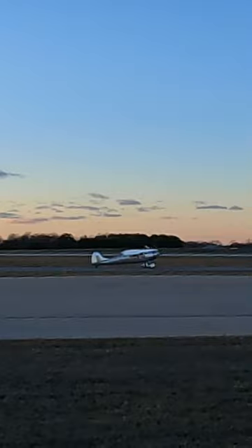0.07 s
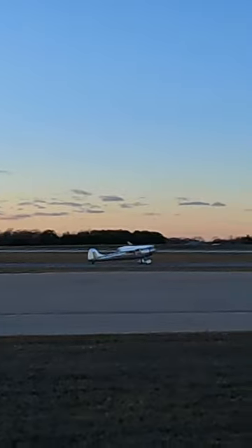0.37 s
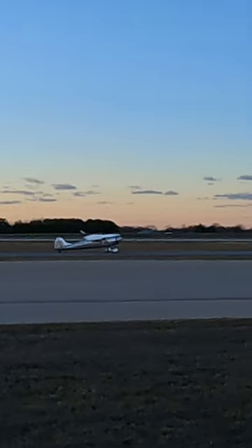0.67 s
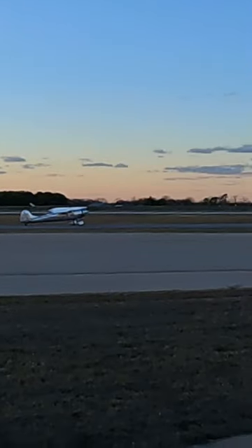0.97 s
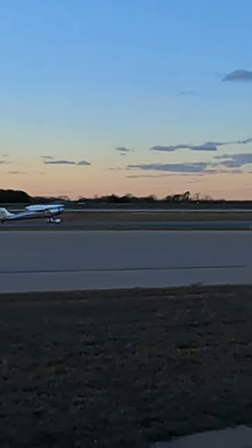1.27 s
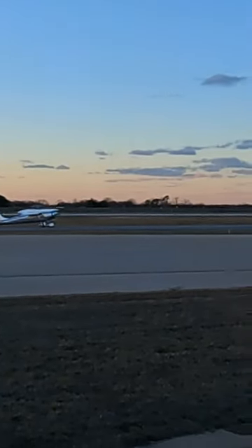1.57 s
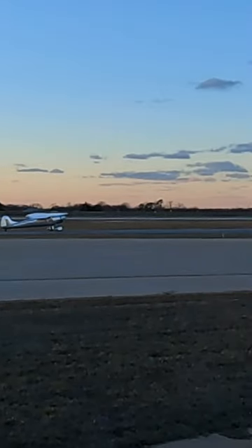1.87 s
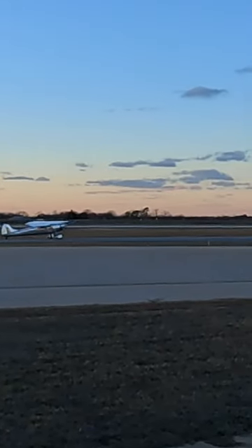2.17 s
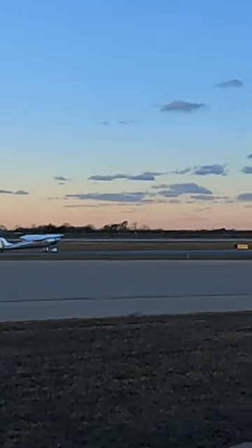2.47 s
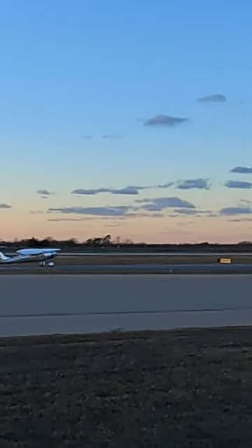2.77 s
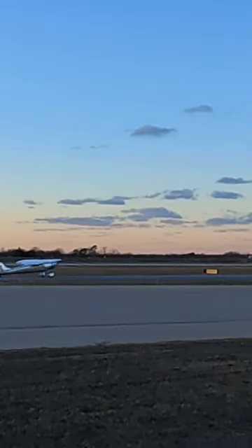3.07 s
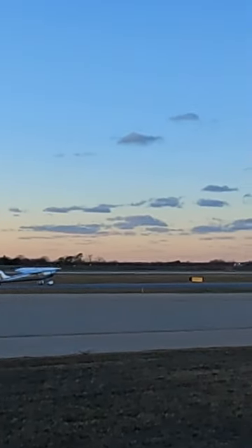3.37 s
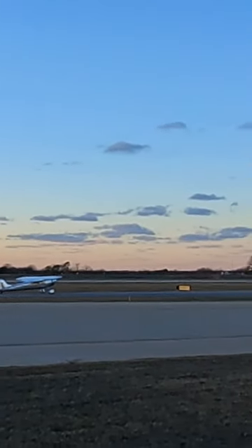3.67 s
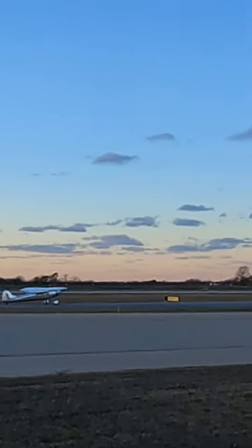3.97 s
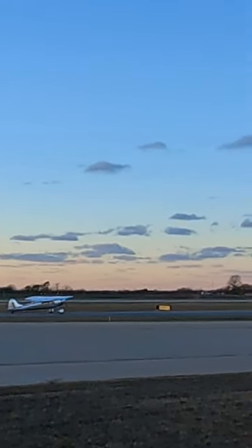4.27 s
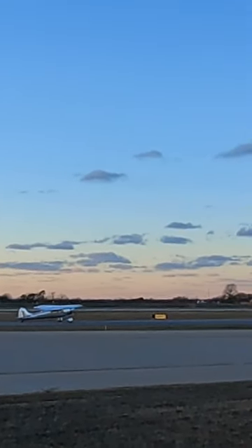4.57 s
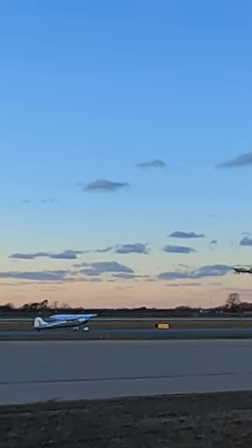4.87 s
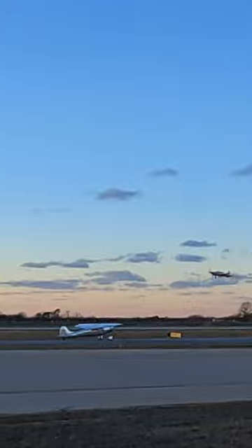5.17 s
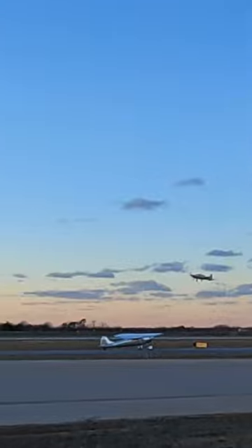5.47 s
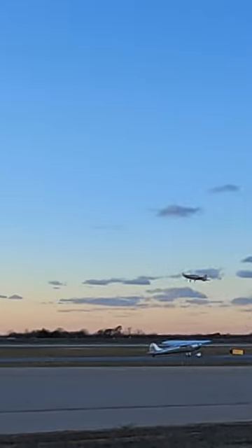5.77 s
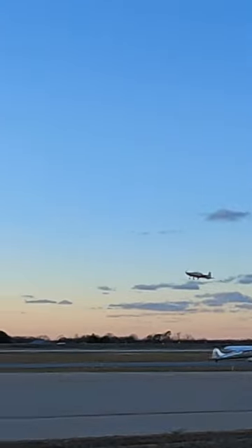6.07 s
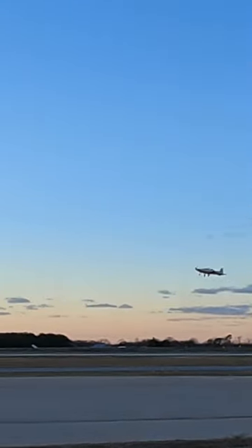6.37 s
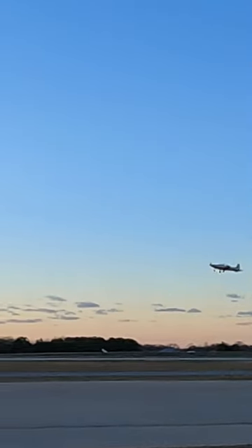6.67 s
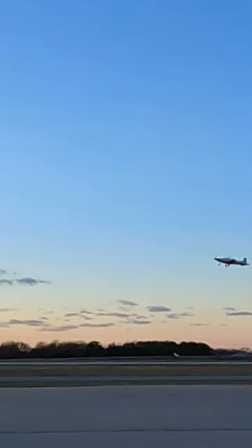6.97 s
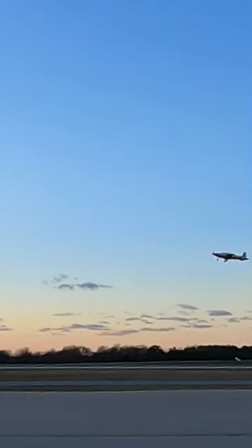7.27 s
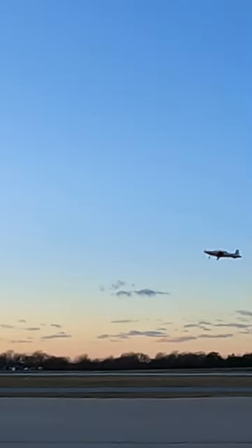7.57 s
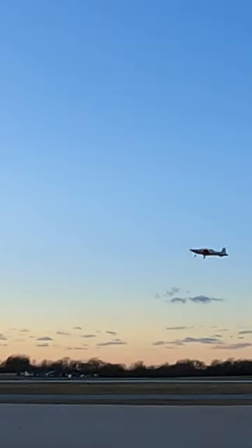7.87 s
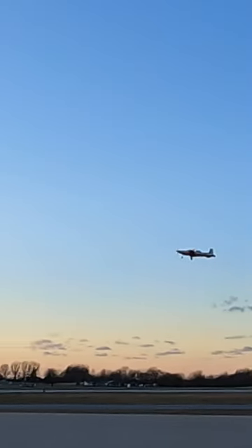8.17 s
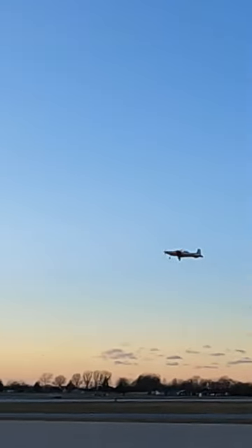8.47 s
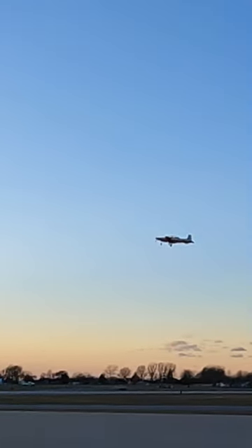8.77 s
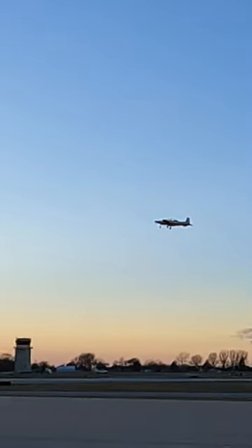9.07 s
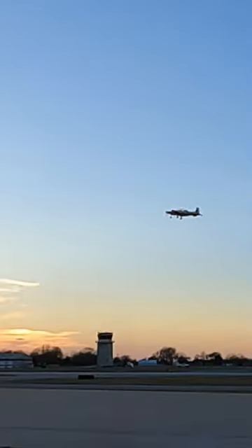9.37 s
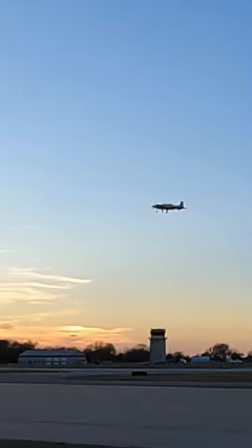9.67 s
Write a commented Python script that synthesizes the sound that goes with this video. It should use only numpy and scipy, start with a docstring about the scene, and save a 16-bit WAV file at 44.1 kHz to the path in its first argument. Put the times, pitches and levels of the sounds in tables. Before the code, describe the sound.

A small propeller plane taxis by, rumbling and clattering, as a second swells into a low flypast, with light wind on the microphone.

```python
"""A light plane's seven-cylinder radial engine taxis past: its firings rumble and spit in the exhaust,
its jet and blades rasp, its valves clatter. Behind it a second propeller plane flies in low and passes:
the blade pulses swell into a drone that sinks with the Doppler shift, amid engine whine and a surging
roar of torn air. Brief rustles come and go, and a light wind flutters on the microphone."""
import sys
import numpy as np
from scipy import signal
from scipy.fft import rfft, irfft, next_fast_len
from scipy.io import wavfile
from scipy.ndimage import uniform_filter1d

SR = 44100
rng = np.random.default_rng(int(sys.argv[2]) if len(sys.argv) > 2 else 0)


def generate_wav(sig):
    """Save sig (samples, or channels by samples) to the path in sys.argv[1] as 16-bit PCM at SR."""
    pcm = np.round(np.clip(np.atleast_2d(sig).T, -1, 1) * 32767).astype(np.int16)
    wavfile.write(sys.argv[1], SR, pcm)


N = 433503
T = np.arange(N) / SR

# The throttle is nudged, then the engine settles. Each row: time in seconds, firings per second.
FIRING_RATE = [(0, 60), (.73, 72.7), (1.7, 63.2), (3.03, 67.4), (3.86, 64.5), (5.9, 66), (9.8, 66)]
# A band of rasp and clatter lifts and hollows as the plane turns.
# Each row: time in seconds, centre in Hz, gain in dB.
TURNING_COLOUR = [(.4, 4700, 6), (1.0, 4000, 6), (1.5, 3570, -6.5), (3.0, 3540, -3.5), (5.399, 3830, 2.5),
                  (6.6, 4195, -6), (7.5, 4240, 3.5)]

def taxiing_plane():
    """The radial engine: seven firings and two propeller turns make one cycle."""
    firing_hz, = in_time(FIRING_RATE)
    firings = np.cumsum(firing_hz * (1 + .003 * drift(2.5))) / SR
    cycles = firings / 7
    valves = valve_clatter(firings)
    jet = rasp(firings, firing_hz, shaft=2 * cycles)
    bright_layer = moving_eq(jet + valves, TURNING_COLOUR, width_hz=590)
    return exhaust(cycles) + bright_layer + squeaks() + exhaust_spits() + dry_ticks()


# The exhaust's fader. Each row: time in seconds, level in dB.
EXHAUST_LEVEL = [(0, -20.5), (.75, -20.5), (1.5, -22.5), (2.3, -23.5), (2.75, -23.5), (3.05, -26.5),
                 (4.2, -25), (5.9, -24), (6.35, -28.5), (7.5, -28), (8.1, -27.5), (8.6, -31), (8.9, -24),
                 (9.35, -33), (9.8, -26)]
# Its note. Each row: multiple of the engine cycle rate, relative level in dB.
EXHAUST_ORDERS = [(4, -11.5), (5, -14), (7, -7), (8, -12.5), (9, -0.5), (10, -6.5), (11, -14), (12, -0.5),
                  (13, -12), (14, -1.2), (16, -8), (24, -20.5), (26, -19.5), (28, -27)]
# Its rumble. Each row: frequency in Hz, relative density in dB.
RUMBLE_SPECTRUM = [(25, -13), (45, 3.5), (85, -2), (130, -1), (165, -4.5), (195, -14.5), (245, -14),
                   (330, -27.5), (500, -38.5)]

def exhaust(cycles):
    """Unequal cylinders give multiples of the cycle rate, hollowed by the pipe, over an unsteady rumble."""
    note = rms_one(sum(from_db(db) * tone(order * cycles + rng.random(), scatter=.4, rate=.33)
                       for order, db in EXHAUST_ORDERS))
    pipe_notch = signal.iirnotch(180, Q=6, fs=SR)
    note = signal.lfilter(*pipe_notch, note)
    note *= np.interp(T, [1.0, 1.6], [.65, 1])   # weaker while the throttle moves
    return fader(EXHAUST_LEVEL) * (note + from_db(-1) * coloured(RUMBLE_SPECTRUM))


# The fader shared by rasp, clatter and spits. Each row: time in seconds, level in dB.
RASP_LEVEL = [(0, -52), (.7, -52.5), (1.7, -52), (2.4, -62.5), (2.8, -61), (3.4, -56), (3.9, -53),
              (4.15, -55), (4.55, -53), (5.85, -56), (6.3, -57)]

def rasp_db():
    """The rasp follows its fader, then dies by 4 dB a second as the plane rolls away."""
    return in_time(RASP_LEVEL)[0] - 4 * np.maximum(T - RASP_LEVEL[-1][0], 0)


# How hard the rasp is chopped. Each row: time in seconds, depth from 0 to 1.
CHOP_DEPTH = [(0, 0.46), (.8, 0.36), (1.5, 0.3), (2.3, 0.19), (4, 0.32), (5.7, 0.49)]
# Its colour as the plane rolls by. Each row: frequency in Hz, early and late relative density in dB.
RASP_SPECTRUM = [(200, -19, -5.5), (410, -1, 3.5), (666, 5.5, 6), (1320, -1.5, -2), (1820, -9.5, -17),
                 (2330, -11, -13), (2780, -10, -11.5), (3527, -12, -11), (4760, -22, -19),
                 (5440, -22.5, -25.5), (7060, -24.5, -28.5), (9600, -42, -40), (11000, -71, -62),
                 (13000, -72, -72.5)]
# A ringing peak slides through it as the plane turns. Each row: time in seconds, centre in Hz, boost in dB.
RASP_PEAK = [(.1, 2400, 5.5), (.6, 2440, 3), (1.0, 2480, 5.5), (1.9, 2290, 7), (3.5, 2120, 10),
             (5, 2190, 10), (6.299, 2320, 11)]

def rasp(firings, firing_hz, shaft):
    """Firings and blade passes chop the exhaust jet's bright noise; each firing has its own colour."""
    depth, = in_time(CHOP_DEPTH)
    chop = (puffs(firings, sharpness=2.4, uneven_db=7)
            + .78 * puffs(shaft, sharpness=2.8, uneven_db=0)
            + 2.8 * puffs(2 * shaft, sharpness=.77, uneven_db=-4))
    flutter = rms_one(1 - depth + depth * rms_one(chop))
    rev_lift = from_db(.69 * (firing_hz - 67.3))   # the top brightens with the revs
    turned = np.clip((T - 2) / .89, 0, 1)
    points_hz, *colours_db = np.transpose(RASP_SPECTRUM)
    edges_hz = np.geomspace(200, 13000, 25)
    jet, treble_power = 0, 0
    for low, high in zip(edges_hz, edges_hz[1:]):
        early, late = (from_db(np.interp(np.log(low * high) / 2, np.log(points_hz), db))
                       for db in colours_db)
        gain = np.sqrt(high - low) * (early * (1 - turned) + late * turned)
        uneven_db = np.interp(low, [800, 3000], [1.2, 3])
        per_firing = rms_one(from_db(uneven_db * rng.standard_normal(700)))
        flicker = np.interp(firings, np.arange(700), per_firing)
        jet += gain * flicker * (rev_lift if low > 4700 else 1) * band(low, high, 0, order=20)
        treble_power += gain ** 2 * (low > 2800)
    jet *= from_db(rasp_db() - .5) * flutter / np.sqrt(treble_power)   # the fader rides the treble
    return moving_eq(jet, RASP_PEAK, width_hz=150)


# The ring of the valve gear. Each row: pitch in Hz, relative level in dB.
VALVE_MODES = [(2220, 6), (2480, -2.5), (3050, -3.5), (3290, 4), (3570, 1.5), (3850, -3.5), (4400, 0),
               (5000, -6), (5350, -8), (6000, -8), (6500, -11), (7100, -9.5)]

def valve_clatter(firings):
    """Valves tap with the firings; each tap stirs every mode with a strength of its own."""
    tap = firings.astype(int)
    contact = np.exp(-6 * ((firings - .4) % 1))
    force_db = 3 * chance(700)
    metal = 0
    for hz, db in VALVE_MODES:
        strength = from_db(force_db + 4 * chance(700))
        taps = contact * strength[tap] * rng.standard_normal(N)
        metal += from_db(db) * rms_one(ring(taps, hz, t60_s=.018))
    return from_db(rasp_db() - 5) * rms_one(metal)


# Two runs of spitting. Each row: start, end and gap between spits, all in seconds.
SPIT_RUNS = [(1.185, 2.09, .052), (3.379, 5.7, .0546)]

def exhaust_spits():
    """About one uneven spit per propeller turn; each rattles the cowling at two pitches."""
    starts = np.concatenate([np.arange(*run) for run in SPIT_RUNS])
    jitter, spit_force, *rattle_forces = np.clip(rng.standard_normal((len(starts), 4)), -2, 1.5).T
    starts += .007 * jitter
    base_db = np.interp(starts, T, rasp_db())
    spits = [(s, db, 5400) for s, db in zip(starts, base_db - .5 + 4 * spit_force)]
    out = bursts(spits, spread=1.25, rise_s=.0015, decay_s=.008)
    for hz, force in zip((3300, 4350), rattle_forces):
        rattles = [(s, db, hz) for s, db in zip(starts, base_db + .5 + 4 * force)]
        out += bursts(rattles, spread=1.045, rise_s=.002, decay_s=.014)
    return out


# Metallic squeaks. Each row: start in seconds, gain in dB, pitch in Hz.
SQUEAKS = [(.468, -39, 4340), (.485, -42, 2490), (.59, -34, 2450), (.632, -33, 2440), (.683, -41, 4370),
           (.77, -42, 3430), (.815, -39, 3500)]

def squeaks():
    """Metal rings in short, narrow bursts as the throttle is nudged."""
    return bursts(SQUEAKS, spread=1.02, rise_s=.005, decay_s=.012)


# Accents in the clatter. Each row: start in seconds, gain in dB, pitch in Hz.
TICKS = [(1.245, -47, 5220), (1.795, -55, 6500), (3.381, -48, 4250), (3.438, -40, 3007), (3.595, -54, 4800),
         (3.917, -37, 3530), (4.462, -41.5, 4320), (4.525, -45, 5300), (4.96, -39, 3380),
         (5.172, -39.5, 4307), (5.23, -41, 3400), (5.4, -39.5, 3450), (5.556, -41, 2886),
         (5.669, -39, 3600), (5.722, -40.5, 4360), (5.781, -42, 4100), (5.795, -36, 3820),
         (5.829, -40, 4255), (5.843, -41.5, 4650), (6.053, -44.5, 4050)]

def dry_ticks():
    """Sharp ticks, too broad and brief to ring."""
    return bursts(TICKS, spread=1.14, rise_s=.001, decay_s=.007)


# The drone's heard pitch wavers a little on its way to the listener.
# Each row: time in seconds, offset in Hz.
PITCH_WAVER = [(4.8, 0), (5.2, -.5), (5.7, .6), (6.25, 0), (6.48, 1.7), (6.7, 0), (7.0, 0), (7.25, -.6),
               (8.2, -.1), (8.42, .8), (8.7, -.3), (9.2, .1), (9.8, -.5)]
# The flying plane's roar comes in surges. Each row: time in seconds, level in dB, where -40 is neutral.
ROAR_SURGES = [(2.7, -54), (3.0, -47), (3.5, -41.5), (3.68, -47), (3.87, -42), (4.2, -46), (4.55, -41),
               (4.75, -42), (5.0, -36), (5.2, -45.5), (5.39, -36), (5.6, -45), (5.82, -47), (5.93, -41),
               (6.15, -42), (6.34, -35.5), (6.62, -47), (6.78, -42), (6.95, -44), (7.1, -31.7),
               (7.24, -39.5), (7.36, -32), (7.48, -42), (7.62, -33.8), (7.75, -38), (8.03, -39.5),
               (8.48, -47), (8.8, -38.7), (9.0, -43), (9.19, -35.5), (9.33, -45), (9.55, -46.5),
               (9.8, -39.5)]
BLADE_HZ, SPEED_M_PER_S, SOUND_M_PER_S = 135.6, 53.7, 343
MISS_DISTANCE_M, ABEAM_S = 153, 8.9

def flying_plane():
    """A straight pass: the angle from nose to listener sets the Doppler shift and which beams are heard."""
    bearing = np.arctan2(MISS_DISTANCE_M, SPEED_M_PER_S * (ABEAM_S - T))
    doppler = 1 / (1 - SPEED_M_PER_S / SOUND_M_PER_S * np.cos(bearing))
    heard_hz = BLADE_HZ * doppler + in_time(PITCH_WAVER)[0]
    blades, angle = np.cumsum(heard_hz) / SR, np.degrees(bearing)
    surge_db = in_time(ROAR_SURGES)[0] + 40
    return (propeller_drone(blades, angle, surge_db) + engine_whine(blades, heard_hz)
            + exhaust_growl(blades) + air_roar(blades, angle, surge_db))


# Faders for blade harmonics one to four; the first swells and fades against the ground reflection.
# Each row: time in seconds, level in dB.
FUNDAMENTAL_LEVEL = [(1.2, -41), (1.42, -33.5), (1.69, -21.5), (1.96, -42), (2.18, -18), (2.62, -26),
                     (2.89, -20), (3.05, -32), (4.19, -35.5), (4.41, -25.5), (4.85, -22), (5.83, -22.5),
                     (6.26, -15), (6.75, -19.5), (6.97, -32), (7.13, -18), (9.47, -13.5), (9.8, -16)]
OCTAVE_LEVEL = [(0, -71), (4.3, -48), (5.4, -38.5), (5.7, -29.5), (5.9, -35.5), (6.1, -30), (6.55, -41),
                (6.75, -36), (7.2, -20), (7.48, -24), (7.65, -19.5), (8.05, -20), (8.3, -16.5), (8.55, -21),
                (8.8, -18.5), (9.3, -19), (9.8, -25.5)]
THIRD_LEVEL = [(0, -81), (5.3, -45), (5.8, -46.5), (6.049, -33.5), (6.35, -31), (6.6, -40.5), (6.8, -33),
               (7.1, -29.5), (7.651, -27), (7.98, -33.5), (8.25, -28), (8.579, -38), (8.85, -29),
               (9.3, -33), (9.8, -38)]
FOURTH_LEVEL = [(0, -83), (5.1, -49.5), (5.75, -47.5), (5.95, -39.5), (6.35, -39), (6.55, -43), (6.78, -49),
                (7.101, -31), (7.7, -29.5), (8.099, -29.5), (8.4, -48), (8.8, -40), (9.199, -46.5),
                (9.8, -50)]
# Higher harmonics are beamed sideways. Each row: multiple of the blade rate, level in dB,
# beam angle from the nose and half width in degrees, share of the surge.
BEAMED_HARMONICS = [(5, -40.5, 72, 17, 0.34), (6, -40, 72, 12, 0.5), (7, -47.5, 73, 12, 0.46),
                    (8, -49, 68, 15, 1), (9, -52, 84, 14, .42)]

def propeller_drone(blades, angle, surge_db):
    """Harmonics in step make one lopsided pulse per blade; turbulence scatters the higher ones more."""
    def harmonic(k, scatter):
        lag_turns = .38 + .28 * (k - 1) ** 2   # skews and smears the pulse
        return tone(k * blades - lag_turns, scatter, rate=14)
    drone = 0
    for k, level in enumerate((FUNDAMENTAL_LEVEL, OCTAVE_LEVEL, THIRD_LEVEL, FOURTH_LEVEL), 1):
        drone += fader(level) * harmonic(k, scatter=.085 * k)
    for k, *beam in BEAMED_HARMONICS:
        drone += beamed(angle, surge_db, *beam, steepness=5) * harmonic(k, scatter=.55)
    return drone


# Layers of the roar. Each row: low and high edge in Hz, slope in dB per octave, level in dB,
# beam angle and half width in degrees, share of the surge.
ROAR_BANDS = [(170, 500, -7.5, -30.5, 85, 27.8, 0.48), (443, 520, -0.5, -32, 63, 12, 0.38),
              (754, 790, 0, -41, 61, 8, 0.86), (574, 924, -4, -38.7, 34, 27, .8),
              (940, 2036, -7.5, -41, 54, 39, .95), (930, 1130, 0.5, -44.5, 120, 11, .5),
              (1130, 1100, 1, -44, 93, 4.8, 0.64), (2280, 4000, -16, -53.5, 78, 22, 1),
              (4030, 8600, -15.5, -65.5, 81, 19, 0.64)]
# The ground echo turns it hollow. Each row: time in seconds, lag in seconds, echo gain.
GROUND_ECHO = [(5.5, .003, .1), (6.3, .003, .25), (7.0, .003, 0), (7.95, .00305, 0), (8.4, .00305, .42),
               (9.2, .00313, .5), (9.55, .0029, .4)]
# A nasal peak climbs during the pass. Each row: time in seconds, centre in Hz, boost in dB.
ROAR_PEAK = [(4, 1610, 4), (6.199, 1700, 4.5), (7.5, 1734, 4.5), (8.401, 1890, 3.5), (9.5, 1915, 11)]

def air_roar(blades, angle, surge_db):
    """Torn air throbs with the blades, wavers in turbulence and is combed by the ground echo."""
    roar = 0
    for low, high, slope, *beam in ROAR_BANDS:
        gain = beamed(angle, surge_db, *beam, steepness=2.2)
        roar += gain * waver(db=.7, rate=16) * band(low, high, slope)
    throb = rms_one(1 + .086 * np.cos(2 * np.pi * blades))
    fade_in = np.clip(T - 1.5, 0, 1)
    roar *= throb * waver(db=1.2, rate=16) * fade_in
    lag_s, strength = in_time(GROUND_ECHO)
    echo = strength * np.interp(T - lag_s, T, roar)
    return moving_eq((roar + echo) / np.sqrt(1 + strength ** 2), ROAR_PEAK, width_hz=94)


# Faders for waves of whine, a brief turbine whistle and thin compressor hiss.
# Each row: time in seconds, level in dB.
WHINE_LEVEL = [(0, -91.5), (3.05, -56.5), (3.3, -42), (3.44, -45.5), (3.53, -39), (3.68, -44), (3.94, -35),
               (4.15, -54), (4.55, -43), (4.8, -53), (5.0, -39), (5.2, -46), (5.42, -32), (5.72, -41.5),
               (6.42, -34), (6.7, -45.5), (7.7, -52), (8.3, -37.5), (9.8, -53)]
WHISTLE_LEVEL = [(0, -100), (5.7, -69.5), (6.2, -61), (6.5, -70.5), (6.75, -66), (6.92, -59.5), (7.12, -55),
                 (7.3, -60), (8.2, -82.5)]
COMPRESSOR_LEVEL = [(0, -130), (6.8, -102), (7.12, -87), (7.4, -93), (8.6, -93), (9.18, -84), (9.4, -96),
                    (9.8, -97)]
WHINE_MULTIPLE, WHISTLE_MULTIPLE, COMPRESSOR_MULTIPLE = 4.68, 21.83, 69.8   # of the blade rate

def engine_whine(blades, heard_hz):
    """Engine, turbine and compressor are geared to the propeller, so all glide down with the pass."""
    whine = tone(WHINE_MULTIPLE * blades, scatter=.45, rate=14)
    whistle = rms_one(swept(band(2900, 3700, 0), WHISTLE_MULTIPLE * heard_hz, width_hz=110))
    hiss = rms_one(band(5, 260, 0, order=3) * np.cos(2 * np.pi * COMPRESSOR_MULTIPLE * blades))
    return fader(WHINE_LEVEL) * whine + fader(WHISTLE_LEVEL) * whistle + fader(COMPRESSOR_LEVEL) * hiss


# The growl opens up as the tail turns to the listener. Each row: time in seconds, level in dB.
GROWL_LEVEL = [(0, -86), (7, -64.5), (8, -34), (8.5, -33), (8.9, -29.5), (9.25, -28), (9.45, -36.5),
               (9.65, -32.5), (9.8, -34)]
# Its resonance. Each row: time in seconds, centre in Hz.
GROWL_CENTRE = [(8.3, 736), (9.0, 709), (9.45, 746), (9.8, 758)]

def exhaust_growl(blades):
    """Two rough tones and noise sputter through one resonance of the flying plane's exhaust."""
    centre_hz, = in_time(GROWL_CENTRE)
    tones = rms_one(sum(tone(k * blades, scatter=.45, rate=12) for k in (WHINE_MULTIPLE, 5)))
    pitched = swept(tones, centre_hz, width_hz=92)
    rough = rms_one(swept(band(600, 830, 0, order=14), centre_hz, width_hz=92))
    sputter = rms_one(waver(db=1.7, rate=35))
    return fader(GROWL_LEVEL) * sputter * rms_one(rough + 1.3 * pitched)


# Rushes of air, rustles and bumps.
# Each row: peak time in seconds, level in dB, centre in Hz, half length in seconds.
RUSTLES = [(0.333, -37, 2240, 0.018), (1.8, -65, 7500, .012), (3.004, -43.5, 500, 0.19),
           (3.556, -42, 724, 0.13), (5.333, -39, 600, 0.02), (3.852, -64, 6000, 0.079),
           (4.197, -31, 300, 0.026), (4.663, -28, 336, 0.013), (4.96, -56, 6000, 0.012),
           (6.564, -62, 5760, 0.0056), (6.367, -34.5, 940, 0.11), (6.778, -46.5, 2660, 0.046),
           (7.122, -50.5, 3650, .045), (8.025, -54, 3570, 0.025), (8.618, -58, 5010, 0.02),
           (8.784, -63.5, 5160, 0.041), (9.035, -58.5, 5480, 0.029), (9.185, -48, 3340, 0.025),
           (0.164, -30, 190, .02), (7.48, -21, 207, .022), (7.563, -19, 197, 0.023),
           (7.961, -22, 188, 0.043), (8.97, -24, 213, 0.037), (9.62, -57, 2740, 0.091)]

def rustles():
    """Short grainy swells of noise, each about an octave wide."""
    spread = np.sqrt(2)
    grain = rms_one(waver(db=2.5, rate=90))
    return grain * sum(from_db(db) * swell(s, half_s) * band(hz / spread, hz * spread, -12, order=3)
                       for s, db, hz, half_s in RUSTLES)


# The wind bed. Each row: time in seconds, level in dB.
WIND_LEVEL = [(0, -26.5), (2, -24.5), (2.4, -36.5), (3.3, -23), (5.8, -28.5), (6.6, -29.5), (7.7, -32.5),
              (8.5, -29), (9.8, -31.5)]
# Its colour. Each row: frequency in Hz, relative density in dB.
WIND_SPECTRUM = [(12, 1.5), (30, 1.5), (55, -0.5), (90, -5), (140, -12.5), (250, -21.5), (500, -48)]
# Its buffets. Each row: peak time in seconds, level against the bed in dB.
BUFFETS = [(1.25, 5.5), (3.22, -1.5), (3.99, 6), (4.23, 4.5), (4.64, 10)]

def wind():
    """Gusts make lumpy low noise on the microphone port, with a few buffets."""
    buffet_db = sum(db * swell(s, half_s=.093) for s, db in BUFFETS)
    return fader(WIND_LEVEL) * from_db(buffet_db) * waver(db=4, rate=25) * coloured(WIND_SPECTRUM)


def from_db(db):
    """Decibels to gain."""
    return 10 ** (np.asarray(db) / 20)


def rms_one(x):
    """Scale to unit power."""
    return x / np.sqrt(np.mean(x ** 2) + 1e-20)


def in_time(rows):
    """Each column of a timed curve, at every sample."""
    times, *columns = np.transpose(rows)
    return [np.interp(T, times, column) for column in columns]


def fader(rows):
    """A timed curve in dB as a gain at every sample."""
    return from_db(in_time(rows)[0])


def swell(peak_s, half_s):
    """A bell-shaped envelope."""
    return np.exp(-.5 * ((T - peak_s) / half_s) ** 2)


def chance(count):
    """Normal draws, held within 2 either way."""
    return np.clip(rng.standard_normal(count), -2, 2)


def drift(rate):
    """A smooth random wander of unit power, slower than about rate Hz."""
    step, run_in = 40, 2000
    pole = np.exp(-2 * np.pi * rate * step / SR)
    white = rng.standard_normal(N // step + run_in + 2)
    slow = signal.lfilter([1], [1, -2 * pole, pole * pole], white)[run_in:]
    return np.interp(np.arange(N) / step, np.arange(len(slow)), rms_one(slow))


def waver(db, rate):
    """A gain that drifts by about db either way."""
    return from_db(db * drift(rate))


def noise(gain_at):
    """Noise of unit power whose gain is a function of frequency."""
    size = next_fast_len(N, real=True)
    hz = np.maximum(np.arange(size // 2 + 1) * SR / size, 1)
    return rms_one(irfft(rfft(rng.standard_normal(size)) * gain_at(hz), size)[:N])


def coloured(spectrum):
    """Noise with the given spectrum, falling away beyond its ends."""
    points, level_db = np.transpose(spectrum)
    return noise(lambda hz: from_db(np.interp(np.log(hz), np.log(points), level_db))
                 * np.minimum(1, hz / points[0]) * np.minimum(1, points[-1] / hz) ** 2)


def band(low_hz, high_hz, slope_db, order=8):
    """A band of noise, tilted by slope_db per octave."""
    return noise(lambda hz: from_db(slope_db * np.log2(np.maximum(hz, low_hz) / low_hz))
                 / np.sqrt((1 + (low_hz / hz) ** (2 * order)) * (1 + (hz / high_hz) ** (2 * order))))


def tone(turns, scatter, rate):
    """A cosine of unit power; a scattered share of it wanders in level and phase."""
    angle = 2 * np.pi * turns
    wave = (1 + scatter * drift(rate)) * np.cos(angle) + scatter * drift(rate) * np.sin(angle)
    return wave * np.sqrt(2 / (1 + 2 * scatter ** 2))


def puffs(turns, sharpness, uneven_db):
    """One swell per turn, each with a strength of its own; unit power."""
    strength = from_db(uneven_db * chance(1000))
    return rms_one(strength[turns.astype(int)] * np.abs(np.sin(np.pi * turns)) ** sharpness)


def bursts(rows, spread, rise_s, decay_s):
    """Quick bursts of noise, each in a resonance whose edges lie a factor of spread from its pitch."""
    out, age = np.zeros(N), np.arange(int(.12 * SR)) / SR
    envelope = (1 - np.exp(-age / rise_s)) * np.exp(-age / decay_s)
    for start_s, db, hz in rows:
        resonance = signal.butter(2, [hz / spread, hz * spread], "band", fs=SR, output="sos")
        burst = rms_one(signal.sosfilt(resonance, rng.standard_normal(len(age))))
        at = int(start_s * SR)
        out[at:at + len(age)] += from_db(db) * envelope * burst
    return out


def ring(clicks, hz, t60_s):
    """A click sets a dying sine ringing."""
    r, w = from_db(-60 / (t60_s * SR)), 2 * np.pi * hz / SR
    return signal.lfilter([0, np.sin(w)], [1, -2 * r * np.cos(w), r * r], clicks + 1e-18)


def swept(x, hz, width_hz, block=128):
    """What passes through a moving resonance, with gain 1 at its peak."""
    out, state, r = np.zeros(N), np.zeros(2), np.exp(-np.pi * width_hz / SR)
    for i in range(0, N, block):
        poles = [1, -(1 + r * r) * np.cos(2 * np.pi * hz[i] / SR), r * r]
        out[i:i + block], state = signal.lfilter([1, 0, -1], poles, x[i:i + block], zi=state)
    return out * (1 - r * r) / 2


def moving_eq(x, path, width_hz):
    """Lift or hollow out a band that moves along a path of time, centre and gain."""
    hz, db = in_time(path)
    return x + (from_db(db) - 1) * swept(x, hz, width_hz)


def beamed(angle, surge_db, db, beam_deg, width_deg, share, steepness):
    """Gain of a beam that is loudest at one angle, 3 dB down width_deg away, and shares the surges."""
    off_axis = np.abs((angle - beam_deg) / width_deg)
    return from_db(db + share * surge_db) * np.sqrt(.5) ** (off_axis ** steepness)


def scene():
    """Both planes in the open air, with rustles and wind, over a faint hiss."""
    hiss = from_db(-88.5) * band(7000, 10500, -2)
    return (taxiing_plane() + flying_plane() + rustles() + wind() + hiss)[None]


# Bass limiters in series. Each row: upper band edge in Hz, ceiling in dB.
BASS_LIMITERS = [(112, -14), (190, -11.5)]

def record(dry):
    """Quick limiters hold down the deep rumble and loudest bass swells; the top is cut."""
    out, window = dry, int(.012 * SR)
    for edge_hz, ceiling_db in BASS_LIMITERS:
        bass = signal.sosfiltfilt(signal.butter(4, edge_hz, fs=SR, output="sos"), out)
        power = uniform_filter1d(uniform_filter1d(bass ** 2, window), window)
        swing = np.sqrt(2 * np.abs(power))
        gain = (1 + (swing / from_db(ceiling_db)) ** 6) ** (-1 / 6)
        out = out + (gain - 1) * bass
    return signal.sosfilt(signal.cheby2(12, 70, 13500, fs=SR, output="sos"), out)


dry = scene()
out = record(dry)
generate_wav(out)
```